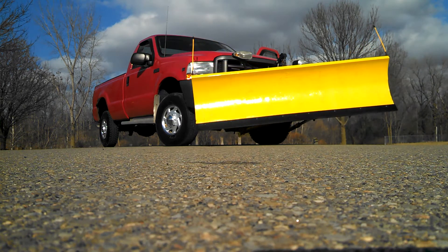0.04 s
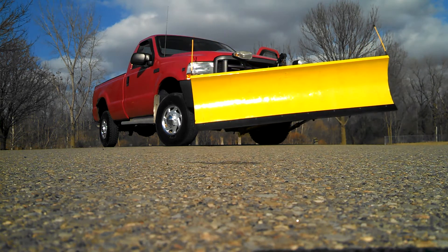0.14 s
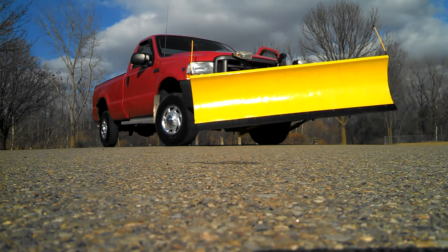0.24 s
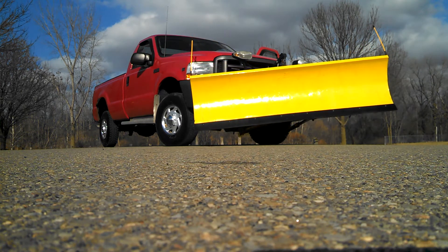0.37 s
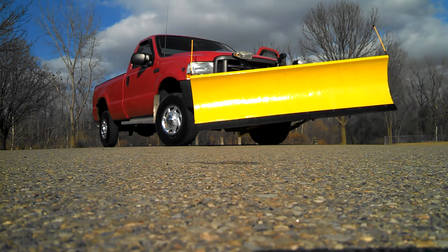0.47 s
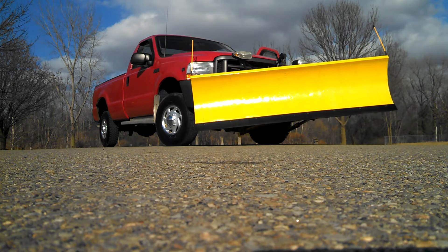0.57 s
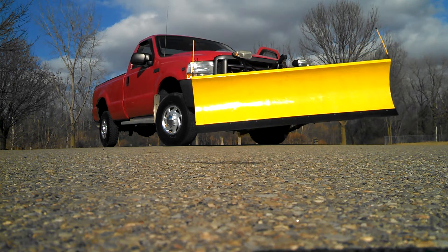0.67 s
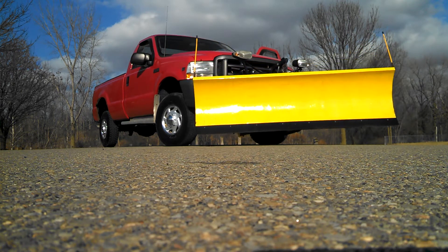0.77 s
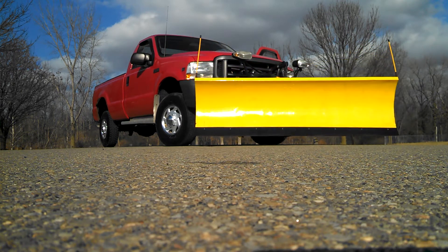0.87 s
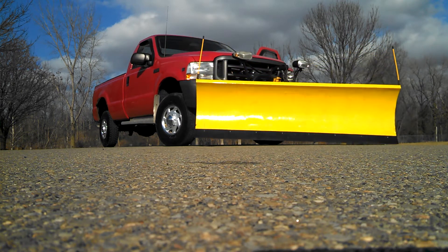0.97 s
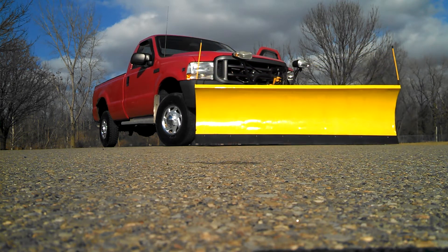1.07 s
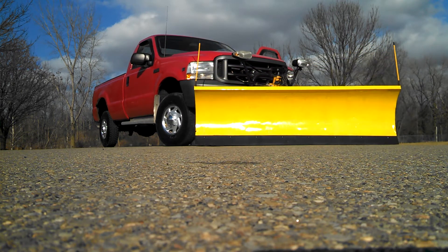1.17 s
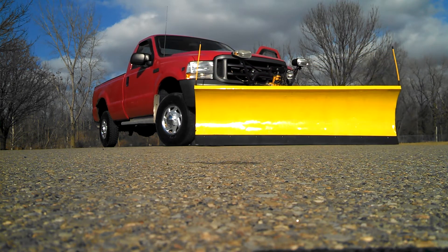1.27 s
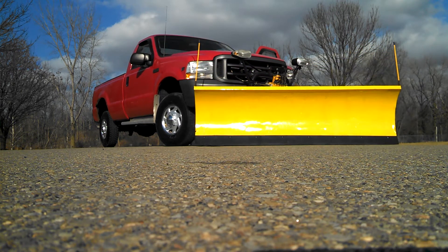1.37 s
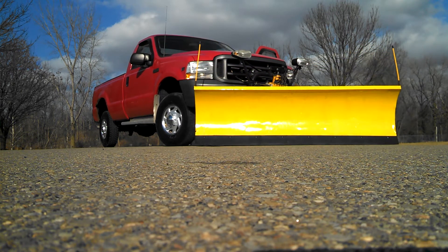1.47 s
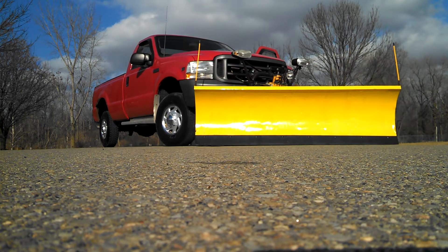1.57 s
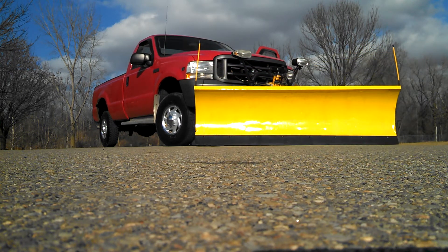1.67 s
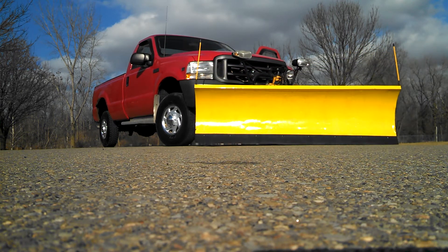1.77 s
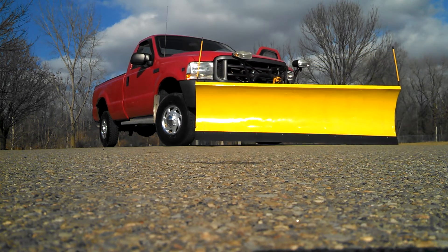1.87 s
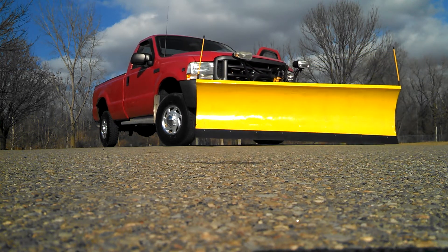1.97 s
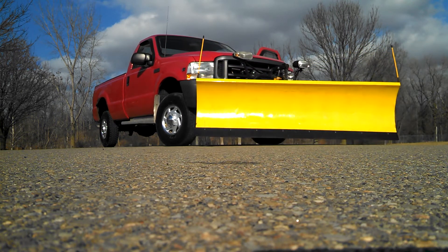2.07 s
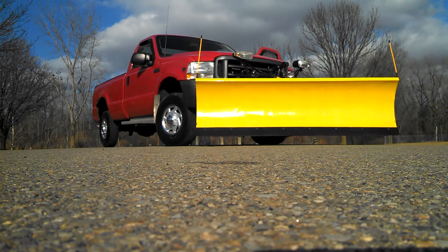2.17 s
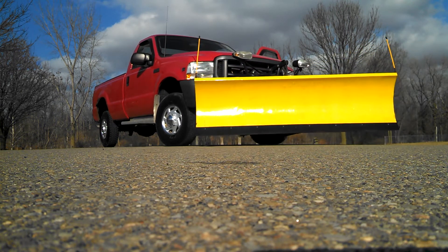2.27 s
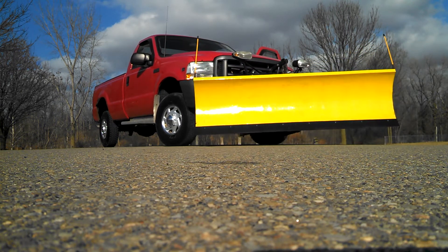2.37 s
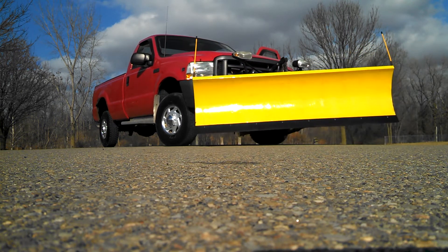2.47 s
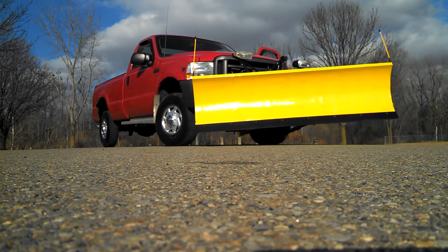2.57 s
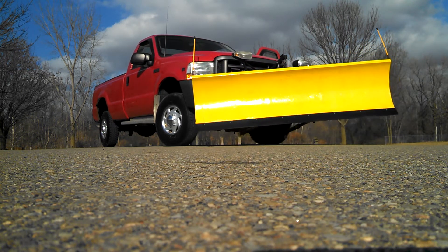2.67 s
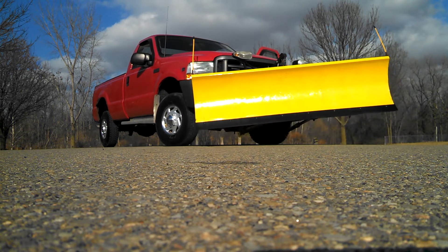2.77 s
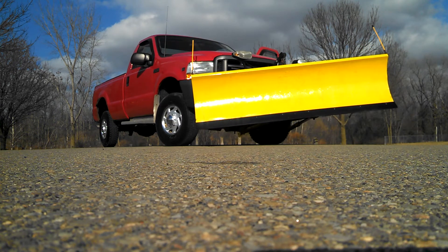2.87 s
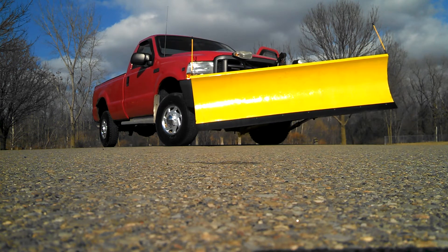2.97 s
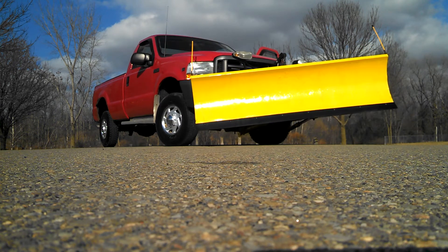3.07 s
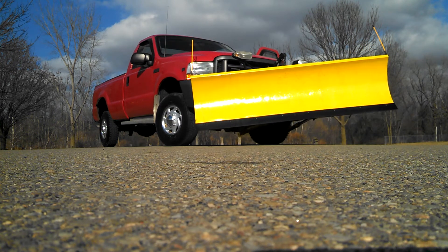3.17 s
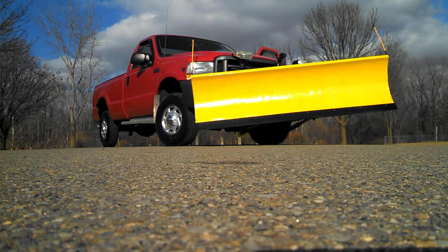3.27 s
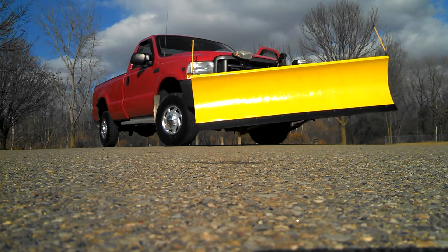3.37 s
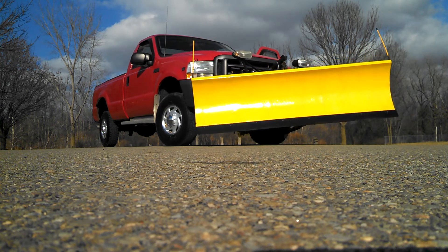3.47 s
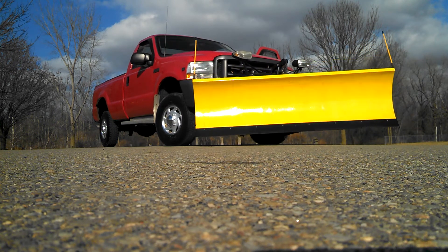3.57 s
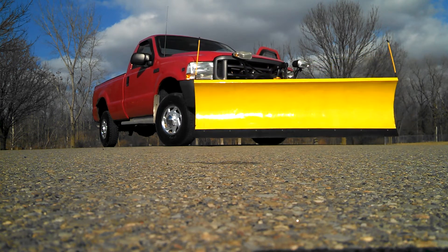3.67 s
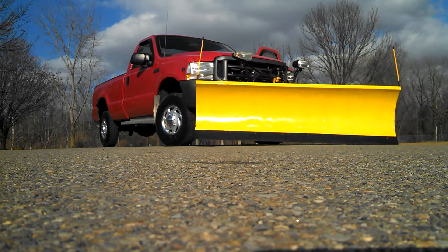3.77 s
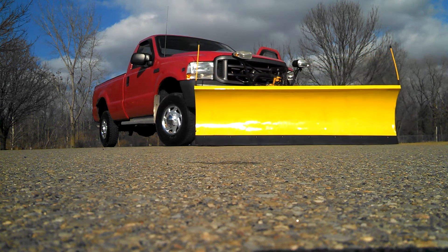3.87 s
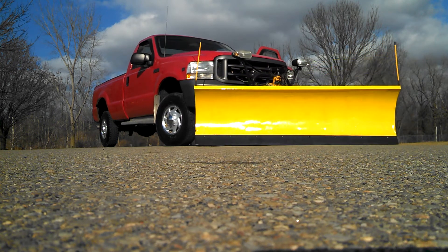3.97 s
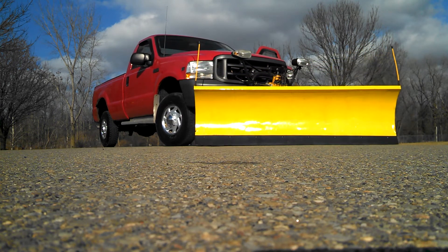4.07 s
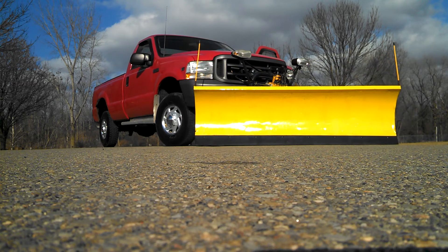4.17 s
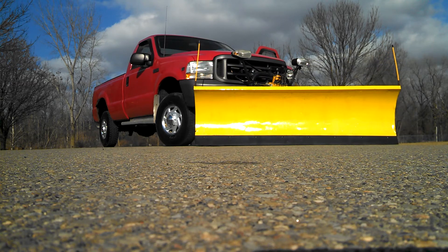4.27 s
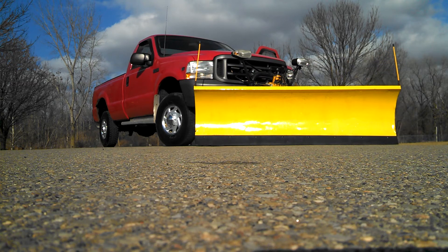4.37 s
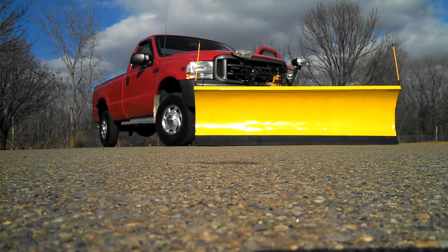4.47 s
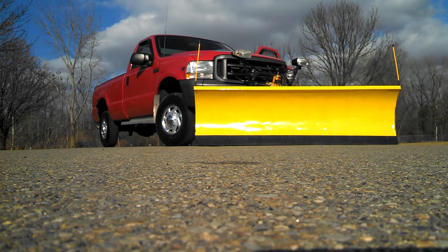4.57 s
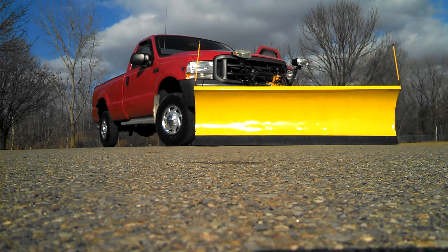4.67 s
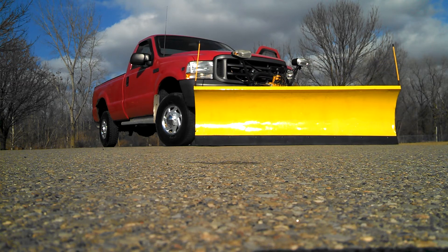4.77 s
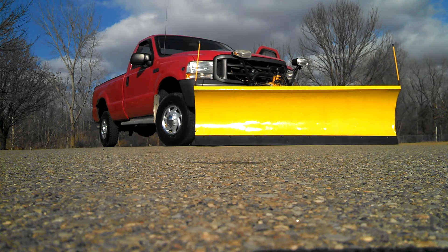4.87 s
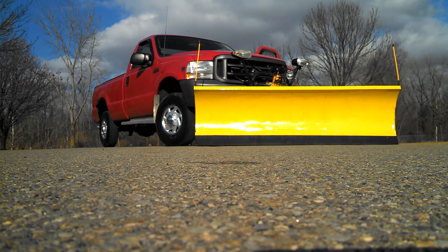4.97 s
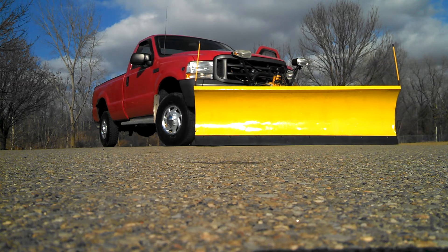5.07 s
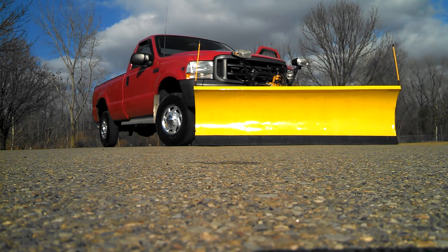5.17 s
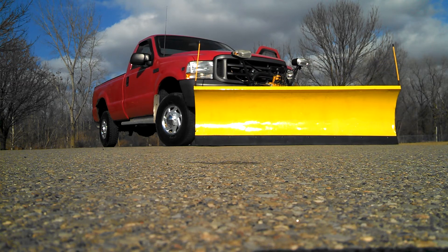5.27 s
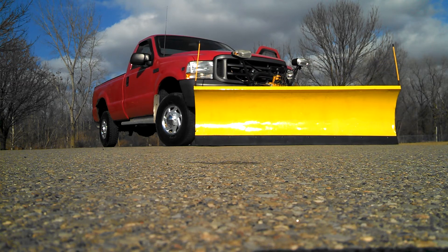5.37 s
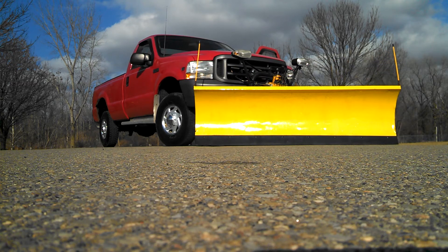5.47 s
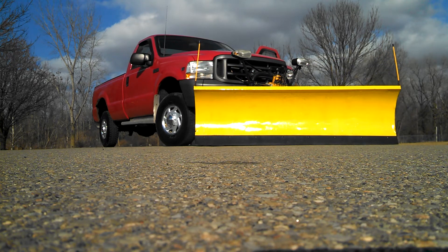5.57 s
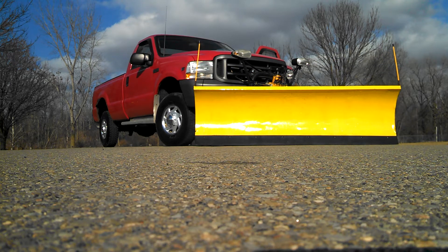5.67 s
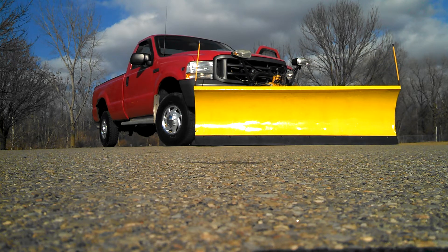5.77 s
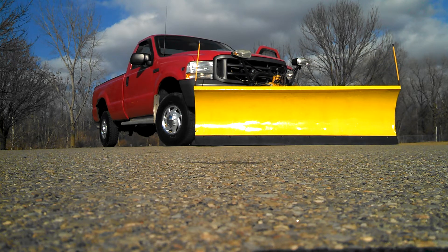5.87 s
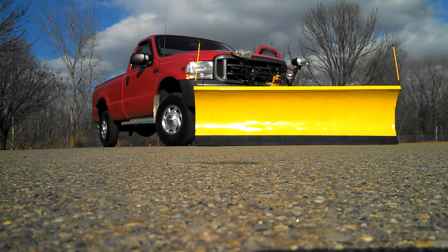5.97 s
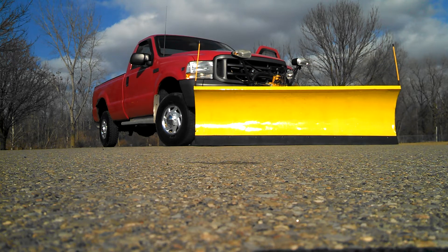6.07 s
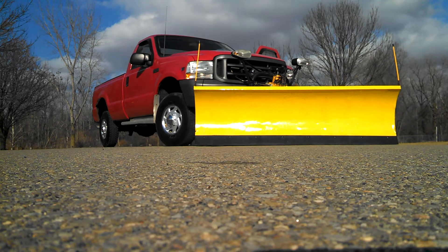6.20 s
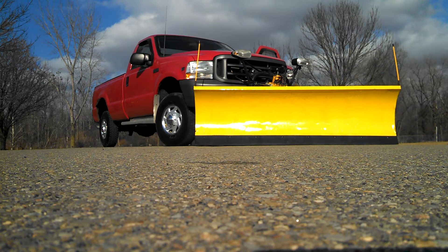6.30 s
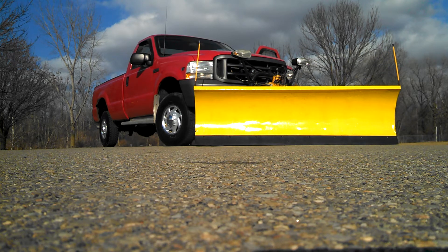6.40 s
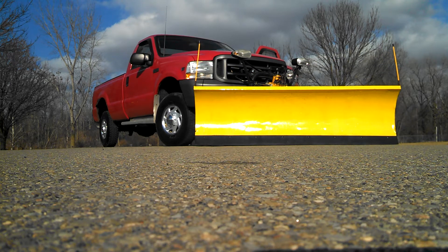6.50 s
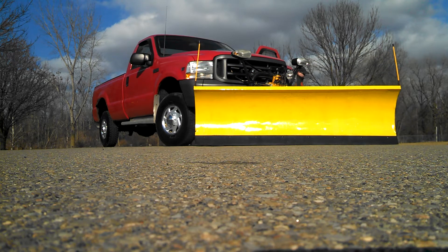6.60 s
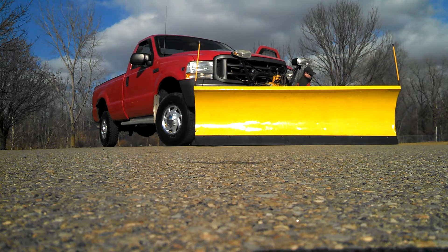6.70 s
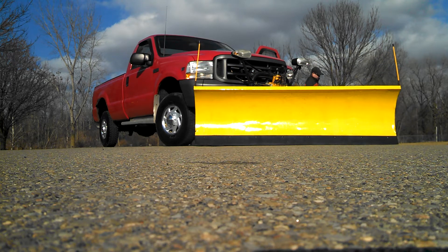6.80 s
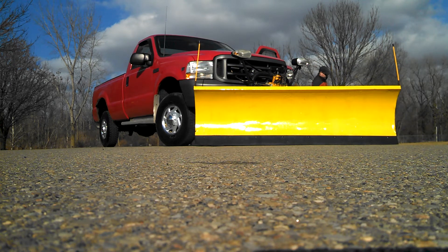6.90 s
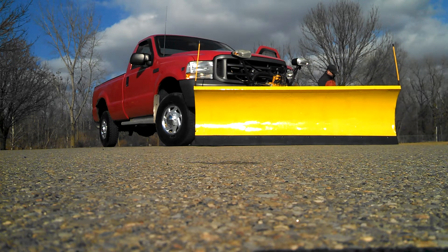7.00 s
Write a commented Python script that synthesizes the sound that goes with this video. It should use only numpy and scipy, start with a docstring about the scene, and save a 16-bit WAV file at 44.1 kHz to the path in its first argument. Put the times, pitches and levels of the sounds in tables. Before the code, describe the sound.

A steel plow blade drops onto pavement twice with ringing bangs and rattling chains, lifted by a whining hydraulic pump while a truck idles.

```python
"""A truck's steel plow blade drops, knocks and bounces on a paved lot, ringing as its pins and chains rattle.
An electric hydraulic pump lifts it: the gears whine, and oil rushes and whistles through the valves.
Behind it the engine idles, a little slower while the pump runs. Two close microphone openings on the
ground form left and right; an automatic volume control ducks after each loud blow and creeps back."""
import sys
import numpy as np
from scipy import signal
from scipy.fft import rfft, irfft, next_fast_len
from scipy.io import wavfile
from scipy.ndimage import uniform_filter1d, map_coordinates

SR = 44100
rng = np.random.default_rng(int(sys.argv[2]) if len(sys.argv) > 2 else 0)


def int16_out(signal):
    """Quantize to a 16-bit WAV file."""
    q = np.round(np.clip(np.atleast_2d(signal).T, -1, 1) * 32767)
    wavfile.write(sys.argv[1], SR, q.astype(np.int16))


N = 310464

# The notes the steel blade rings at: (pitch [Hz], level [dB], time to fade by 60 dB [s])
BLADE_NOTES = [(152, -10, 0.1), (224, -9, 0.12), (350.8, -6, 1), (617.3, -6.5, 0.14), (820, -14.5, 0.33),
               (978, -9, 0.14), (1162, -5, 0.089), (1398, 1.5, 0.064), (1487, 1, 0.044), (1637, -7.5, 0.55),
               (1724, 2.5, 0.021), (1860, -14, 0.21), (2318, -10.5, .08), (4470, -7, 0.065)]
# Hard hits of the blade's edge or its stop:
# (time [s], level [dB], thud [dB], clank [dB], rattle [dB], crack [dB], treble snap [dB])
HARD_HITS = [(0.9866, -4, -40, -3.5, -22, 24, 0.5), (1.095, 0.5, -16, -7, -26, 12, -13),
             (3.3655, -18, -13, -2, -6.5, 29, -14), (3.7677, -4.5, -28, -1, -24, 23.5, 0),
             (3.885, -0.5, -15, -2.5, -26, 24.5, -7)]
# Softer jolts of pins, chain and frame:
# (time [s], level [dB], rise time [s], thud [dB], clank [dB], rattle [dB], clink pitch [Hz])
FRAME_JOLTS = [(0.042, -5.5, 0.0024, -22.5, -7.5, -21.5, 794), (0.056, -9, 0.0031, -12, -7, -33, 730),
               (0.102, -16.5, 0.0071, -10, -11, -28, 682), (0.558, -24.5, 0.011, -6, 6.5, -37, 733),
               (0.584, -19, 0.0073, -6, -3, -17, 809), (0.6, -28, .005, 1.5, -12, -30, 350),
               (0.646, -31, 0.01, 9, 8, -24, 143.5), (0.822, -23.5, .01, 2, -1, -19, 1090),
               (0.849, -27.5, 0.009, -0.5, -12, -25, 352), (0.9, -30, 0.01, -3, -6, -18, 1060),
               (0.999, -5.5, 0.0057, -15, -8, -35, 702), (1.012, -5.5, 0.0092, -14, -0.5, -13, 844),
               (1.124, -2.5, 0.019, -3, -1, -19, 1700), (1.169, -16.5, 0.0075, 8, -18, -31, 756),
               (1.213, -22, 0.011, -14, 3, 5, 1090), (1.235, -13.5, 0.024, -23, 6.5, 4.5, 1613),
               (1.912, -21.5, 0.0026, -22, 7.5, -6.5, 994), (1.925, -23, .004, -15, 3, -15, 1264),
               (2.794, -19, 0.012, -6.5, -9, -43, 808), (2.84, -19, 0.016, -11, 0.5, -14, 1627),
               (3.081, -17, 0.0078, -5.5, -4.5, -33, 843), (3.187, -33, 0.012, -17, 13, -15, 1040),
               (3.222, -24, 0.0056, -4.5, 1.5, -16, 1096), (3.329, -17, 0.019, -5.5, -7, -32, 767),
               (3.349, -16.5, 0.0041, -13, 2, -15, 796), (3.356, -15, 0.0051, -15, 0.5, -12, 891),
               (3.7, -18.5, 0.012, -7, 7, -14, 1730), (3.78, -4.5, 0.0047, -17, -9, -16, 806),
               (3.8, -7.5, 0.012, -5, 2, -10.5, 634), (3.897, -2.5, 0.014, -5, -29, -12, 354),
               (3.925, -6, .012, -1, -15, -29, 354), (3.951, -8, 0.012, -6, -6, -2, 1350)]
# The bands a blow is split into, from bass to treble: (centre [Hz])
BLOW_BANDS = (60, 170, 650, 1700, 4800, 10500, 15000)
# Ringing chain links and pins: (time [s], pitch [Hz], level [dB], time to fade by 60 dB [s])
LINK_RINGS = [(1.013, 6900, -23, 0.098), (1.014, 3900, -35, .08), (1.028, 4400, -32, .05),
              (1.036, 6450, -26, 0.104), (1.126, 1730, -14, .1), (1.21, 4800, -25, .08),
              (1.245, 4120, -24, .06), (2.845, 3840, -32, .09), (2.843, 1620, -21, .07),
              (3.092, 3470, -40, 0.071), (3.222, 4480, -39, 0.09), (3.364, 6560, -36, .08),
              (3.702, 1790, -22, .15), (3.728, 4580, -25, 0.067), (3.703, 3700, -31, .08),
              (3.73, 1750, -16, .08), (3.768, 3980, -12, 0.033), (3.806, 4360, -21, 0.085),
              (3.902, 4150, -33, 0.063)]
# Ticks of an electric valve or a chain link: (time [s], level [dB], low part [dB], middle part [dB])
BRIGHT_TICKS = [(0.324, -36.5, 2, -22), (1.1253, -14.5, 8, -12), (1.6002, -15.5, 2.5, -11),
                (1.7119, -35.5, 28.5, -3), (3.1284, -41, -13, -19), (3.724, -10, 5, -18.5),
                (4.187, -28, 10, -5), (4.9344, -38, 4, -16)]
# Tone colour of many chains and pins jingling: (frequency [Hz], relative level [dB])
JINGLE_COLOUR = [(1500, -30), (3000, -2), (4500, 7.5), (7000, 3.5), (10000, -6.5), (15000, -25)]
# The pump's gear whine: (time [s], pitch [Hz], level [dB], level at 2x pitch [dB], level at 3x pitch [dB])
GEAR_WHINE = [(1.727, 628.6, -26, -42, -43), (1.775, 626, -20.5, -49, -46), (1.85, 618.4, -25, -39, -47),
              (1.911, 604.3, -31, -44, -48), (1.95, 595, -34, -40, -52), (2.01, 562, -30, -50, -47),
              (2.06, 567, -32, -52, -48), (2.15, 568.3, -31, -42, -45), (2.18, 570.4, -47, -38, -39),
              (2.25, 574.5, -39.5, -42, -50), (2.29, 578, -37, -45, -43), (2.34, 578, -43, -46, -52),
              (2.4, 571.8, -32, -39, -42), (2.445, 564, -35, -50, -55), (2.49, 560.4, -27.5, -49, -44),
              (2.57, 555, -30, -55, -58), (2.65, 548.5, -33.5, -52, -51), (2.73, 542, -31, -55, -56),
              (2.81, 550, -35.5, -58, -56)]
# Oil whistling in the valves: (start [s], end [s], pitch [Hz], level [dB])
VALVE_WHISTLES = [(.05, 0.22, 818, -35), (.15, .6, 1684, -48), (.47, .98, 1057, -43),
                  (1.7, 1.9, 730, -37.5), (2.24, 2.6, 747, -43.5), (2.1, 2.55, 867, -47.5),
                  (2.46, 2.72, 1688, -46), (2.87, 3.12, 889, -41.5), (2.88, 3.16, 1464, -39),
                  (2.856, 3.3, 1750, -48), (2.9, 3.08, 2240, -58), (3.24, 3.36, 1072, -41.5)]
# Oil on the move: (start [s], start of fade-out [s], rush [dB], rasp [dB])
OIL_STROKES = [(-.1, 0.476, -34, -42), (0.55, 1.02, -36.5, -45.5), (1.76, 2.04, -34.5, -45),
               (1.986, 2.59, -38, -51), (2.603, 3.304, -41, -43), (3.465, 3.758, -42, -47)]
# Tone colours of the oil's rush and of its rasp in the valve: (frequency [Hz], relative level [dB])
OIL_COLOUR = [(80, -9.5), (200, 0.5), (500, -1.5), (900, -1), (1400, -17), (2500, -27.5), (5000, -24),
              (9000, -36.5)]
RASP_COLOUR = [(900, -35), (1300, 9), (1600, 14.5), (2100, 5), (3000, -37), (6000, -43)]
# When the pump motor loads the engine through the alternator: (start [s], start of fade-out [s])
PUMP_LOADS = [(-1, .5), (1.68, 3.3)]
# Exhaust tones; uneven cylinders add the quarter steps: (multiple of the firing rate, relative level [dB])
EXHAUST_TONES = [(.75, -32), (1, 4), (1.25, -19), (1.5, -21), (1.75, -20), (2, -18), (2.25, -22.5),
                 (2.5, -24), (2.75, -25), (3, -15.5), (3.25, -27), (3.5, -26), (3.75, -27), (4.25, -28),
                 (4.75, -27), (5, -20), (5.25, -25), (5.5, -26), (5.75, -19.5), (6.5, -28), (6.75, -24),
                 (7.5, -28), (7.75, -21), (8, -27), (11.75, -27), (12.75, -30)]
# Tone colours of the engine's rush and of its valve clatter: (frequency [Hz], relative level [dB])
ENGINE_COLOUR = [(25, -43), (55, -27), (90, -18), (150, -25), (250, -23.5), (420, -21), (560, -21),
                 (640, -25), (850, -25.5), (1100, -24.5), (1600, -24.5), (2200, -27), (3200, -35),
                 (6500, -35.5), (9000, -46), (11500, -58), (14500, -45)]
CLATTER_COLOUR = [(600, -27), (1000, -2.5), (1400, 2), (1800, 4), (2600, -24), (5000, -25.5)]
# Extra shaping of the faint, wide rush below the lowest dead spot: (frequency [Hz], gain [dB])
WIDE_RUSH_COLOUR = [(60, -35), (150, -9), (220, -2), (300, -17), (600, -3.5), (1200, -20), (2300, 2)]
# Left compared with right for each source: (frequency [Hz], left louder by [dB], left ahead by [rad])
BLADE_PLACE = [(30, -12, -2), (94.6, 13.5, 4.5), (155, 9, 0), (260, 3.5, 1), (580, 6.5, 0.5),
               (910, 3.5, 0.5), (1440, -3.5, -0.15), (2260, -3, 0.67)]
ENGINE_PLACE = [(32.7, 9.5, -3), (93, 6.5, 6), (149, 16.5, 0.5), (191, 13, -1.3), (288, 13.5, 1.2),
                (530, 10.5, -0.5), (1064, 5.5, 0.4), (1430, -2, -1), (2300, -9, 3.5)]

NULL_HZ = 2765  # the lowest dead spot of the microphone pair, where sound cancels
LANDINGS_S = (.987, 3.767)  # the blade meets the ground


def blade_hits():
    """The blade hits hard: a crack, a bright snap and ringing steel."""
    out, t = np.zeros(N + SR), np.arange(SR // 4) / SR
    snap_hz, snap_fade_s, rebound_s = 2600, .016, .00246
    snap_colour = lambda hz: 1 / (1 + (snap_hz / (hz + 1)) ** 4) / (1 + (hz / snap_hz / 2) ** 2)
    for start, db, *colour_db, crack_db, snap_db in HARD_HITS:
        bite = np.maximum(t - .0012, 0) / .00013  # the edge bites just after first contact
        crack = amp(crack_db) * bite * (2 - bite) * np.exp(-bite)  # one short push and its spring back
        crack += amp(-12.5) * np.roll(crack, round(rebound_s * SR))  # the edge bites a second time
        snap = amp(snap_db - 60 * t / snap_fade_s) * filtered(rng.standard_normal(len(t)), snap_colour)
        steel = steel_blow(t, colour_db, fade_s=.24, damping=.7, contact=crack)
        onset = np.clip(t / .0014, 0, 1) ** 3
        out[round(start * SR):][:len(t)] += amp(db) * onset * (steel + snap)
    return out[:N]


def steel_blow(t, colour_db, fade_s, damping, contact):
    """Noise, the blade's notes and the contact sound fade band by band; damping makes treble die first."""
    variation = rng.standard_normal((len(BLADE_NOTES), 2))
    ring = sum(amp(db + 3.15 * louder - 60 * t / ring_s) * np.sin(2 * np.pi * hz * (1 + .016 * higher) * t)
               for (hz, db, ring_s), (louder, higher) in zip(BLADE_NOTES, variation))
    source = 1.6 * rng.standard_normal(len(t)) + ring + contact
    split = lambda hz: np.array([along(BLOW_BANDS, band, hz) for band in np.eye(len(BLOW_BANDS))])
    thud, clank, rattle = colour_db
    band_db = np.array([-60, thud + 14, 0, clank, rattle + 2, rattle - 21, rattle - 11])
    band_fade_s = fade_s * (np.array(BLOW_BANDS) / 650) ** -damping
    return np.sum(filtered(source, split) * amp(band_db[:, None] - 60 * t / band_fade_s[:, None]), axis=0)


def frame_jolts():
    """Pins, chain and frame jolt: many small contacts swell into one knock, and a loose part clinks."""
    out, t = np.zeros(N + SR), np.arange(SR // 7) / SR
    contacts_s = np.arange(0, t[-1], .003)
    for start, db, rise_s, *colour_db, clink_hz in FRAME_JOLTS:
        bumps = amp(1.5 * np.interp(t, contacts_s, rng.standard_normal(len(contacts_s))))
        blur = np.cumsum(rng.normal(0, .13, len(t)))  # the part rattles, so its pitch blurs
        clink = amp(-1) * np.sin(2 * np.pi * clink_hz * t + blur)
        steel = steel_blow(t, colour_db, fade_s=.14, damping=.099, contact=clink)
        onset = 1 - np.exp(-t / rise_s)
        out[round(start * SR):][:len(t)] += amp(db) * onset * bumps * steel
    return out[:N]


def chain_links():
    """Each link or pin rings briefly on one slightly blurred note."""
    out, t = np.zeros(N + SR), np.arange(SR // 6) / SR
    onset = 1 - np.exp(-t / .003)
    for start, hz, db, fade_s in LINK_RINGS:
        blur = np.cumsum(rng.normal(0, .1, len(t)))
        note = np.sin(2 * np.pi * hz * t + blur)
        out[round(start * SR):][:len(t)] += amp(db - 60 * t / fade_s) * onset * note
    return out[:N]


def ticks():
    """An electric valve or a chain link clicks: a short, hissy burst of noise."""
    out, t = np.zeros(N + SR), np.arange(SR // 8) / SR
    colour_hz, fade_s = (800, 2500, 7000, 9500, 12500, 15200), .055
    for start, db, low_db, mid_db in BRIGHT_TICKS:
        colour_db = (low_db - 5, low_db - 4.5, low_db - 7.5, mid_db, -4, 3)
        hiss = filtered(rng.standard_normal(len(t)), lambda hz: amp(along(colour_hz, colour_db, hz)))
        out[round(start * SR):][:len(t)] += amp(db - 60 * t / fade_s) * hiss
    return out[:N]


def shaking(fade_s=1.84):
    """How strongly the frame and oil shake: a jump at each hard hit that then dies away."""
    t = np.arange(N) / SR
    return sum((t > start) * amp(db - 60 * np.abs(t - start) / fade_s) for start, db, *_ in HARD_HITS)


def chain_jingle(shake):
    """Chains and pins jingle densely while the frame shakes."""
    return amp(-33 + 2.5 * wobble(56)) * lag(shake, seconds=.02) * noise(JINGLE_COLOUR, patchy_db=2.2)


def pump_gears():
    """The gears whine with two overtones; their teeth mesh roughly, so the level flutters."""
    times, *columns = np.transpose(GEAR_WHINE)
    hz, *levels = [np.interp(np.arange(N) / SR, times, column) for column in columns]
    whine = sum(amp(db) * tone(k * hz, waver_db=1.4, drift=.00343) for k, db in enumerate(levels, 1))
    return gate(times[0], times[-1], ramp_s=.0065) * amp(1.4 * wobble(70)) * whine


def oil_flow(shake, ramp_s=.16):
    """Oil rushes, and rasps in the valve, whenever it flows or a hit shakes it."""
    rush_level, rasp_level = amp(-22.5) * shake, amp(-36) * shake
    for start, end, rush_db, rasp_db in OIL_STROKES:
        flowing = gate(start, end + ramp_s, ramp_s)
        rush_level += amp(rush_db) * flowing
        rasp_level += amp(rasp_db) * flowing
    rush = rush_level * amp(1.2 * wobble(14)) * noise(OIL_COLOUR, patchy_db=1.4)
    rasp = rasp_level * amp(4 * wobble(60)) * noise(RASP_COLOUR, patchy_db=2.5)
    return rush + rasp


def valve_whistles():
    """Oil in the valves whistles on held, fluttering notes."""
    flutter = amp(2.5 * wobble(90) - 1)
    return flutter * sum(amp(db) * gate(start, end, ramp_s=.021) * tone(hz, waver_db=3.2, drift=.011)
                         for start, end, hz, db in VALVE_WHISTLES)


def engine():
    """The exhaust hums, a rush throbs and the valves tap at each firing; the pump's load slows it all."""
    t = np.arange(N) / SR
    idle_hz, loaded_hz, ramp_s = 69.5, 65.66, .1762
    load = sum(gate(start, end + ramp_s, ramp_s) for start, end in PUMP_LOADS)
    firing_hz = idle_hz + (loaded_hz - idle_hz) * load
    firings = np.cumsum(firing_hz) / SR
    swell_db, swell_s = 8, 1.62  # the noisy parts are louder after a landing, then fade back
    swell = amp(swell_db * sum((t > s) * np.clip(1 - (t - s) / swell_s, 0, 1) for s in LANDINGS_S))
    exhaust = sum(amp(db) * tone(k * firing_hz, waver_db=min(.4 * k, 3), drift=.003)
                  for k, db in EXHAUST_TONES)
    hum = amp(-31.5 - 1.5 * load) * exhaust
    throb = 1 + .081 * np.cos(2 * np.pi * firings) + .039 * wobble(40)
    rush = amp(-37) * throb * noise(ENGINE_COLOUR, patchy_db=1)
    idle = hum + swell * (rush + valve_clatter(firings, firing_hz))
    return stereo(idle, ENGINE_PLACE) + wide_rush(swell)


def valve_clatter(firings, firing_hz, fade_s=.025):
    """The engine's valves tap once per firing, each time with a random strength."""
    tap_db = 6.9 * rng.standard_normal(int(firings[-1]) + 1)
    since_tap_s = (firings % 1) / firing_hz
    taps = amp(tap_db[firings.astype(int)] - 60 * since_tap_s / fade_s)
    return amp(-51) * unit(taps) * noise(CLATTER_COLOUR, patchy_db=4.5)


def wide_rush(swell):
    """A faint, wide rush, opposed in left and right, fading at the dead spots."""
    rush = amp(-42.5) * swell * noise(ENGINE_COLOUR, patchy_db=1.5)
    opposed = stereo(rush, ENGINE_PLACE) * [[1], [-1]]
    low = lambda hz: amp(along(*np.transpose(WIDE_RUSH_COLOUR), hz)) * np.clip((NULL_HZ - hz) / 400, 0, 1)
    high = lambda hz: amp(-8) * np.abs(np.sin(np.pi * hz / NULL_HZ)) * (hz > NULL_HZ)
    return filtered(opposed, lambda hz: low(hz) + high(hz))


def stereo(x, place):
    """Two close microphone openings: the right channel is x, the left is shifted in level and phase."""
    points_hz, louder_db, ahead_rad = np.transpose(place + [(NULL_HZ, 0, np.pi)])

    def left(hz):
        below = hz < NULL_HZ
        phase = np.where(below, along(points_hz, ahead_rad, hz), np.pi + 2 * np.pi * hz / NULL_HZ)
        db = np.where(below, along(points_hz, louder_db, hz), -2.5 * np.sin(np.pi * hz / NULL_HZ) ** 2)
        return amp(db) * np.exp(1j * phase)
    return np.array([filtered(x, left), x])


def volume_control(x):
    """Peaks over the limit pull the volume down; it climbs back at a steady pace."""
    limit_db, deepest_db, start_db, climb_db_per_s = -15, -19.5, -11.5, 11.5
    peak_db = 10 * np.log10(lag(np.max(x ** 2, axis=0), seconds=.0012) + 1e-12)
    needed_db = np.clip(1.05 * (limit_db - peak_db), deepest_db, 0)
    climb_db = climb_db_per_s * np.arange(N) / SR
    gain_db = np.minimum(np.minimum.accumulate(needed_db - climb_db), start_db) + climb_db
    return x * amp(start_db + lag(gain_db - start_db, seconds=.055))


def amp(db):
    """Turn decibels into a plain multiplier."""
    return 10 ** (np.asarray(db) / 20)


def unit(x):
    """Scale x to an average strength (rms) of 1."""
    return x / np.sqrt(np.mean(x ** 2) + 1e-20)


def along(points_hz, values, hz):
    """Read between the points of a curve, with octaves evenly spaced."""
    return np.interp(np.log(hz + 1), np.log(np.add(points_hz, 1)), values)


def gate(start, end, ramp_s):
    """Fade from 0 to 1 and back along straight ramps."""
    t = np.arange(N) / SR
    return np.clip(np.minimum(t - start, end - t) / ramp_s, 0, 1)


def lag(x, seconds):
    """Follow x sluggishly, smoothing out quick changes."""
    keep = np.exp(-1 / (SR * seconds))
    return signal.lfilter([1 - keep], [1, -keep], x)


def wobble(rate):
    """A smooth curve through `rate` random values a second."""
    t = np.arange(0, N + 64, 64) / SR
    points = rng.standard_normal(int(N * rate / SR) + 4)
    return np.interp(np.arange(N) / SR, t, map_coordinates(points, [t * rate]))


def filtered(x, response):
    """Multiply each frequency in x by response(hz)."""
    size = next_fast_len(x.shape[-1] + 4096)
    return irfft(rfft(x, size) * response(np.fft.rfftfreq(size, 1 / SR)), size)[..., :x.shape[-1]]


def noise(colour, patchy_db):
    """Noise of a given tone colour, with random louder and softer patches in time and pitch."""
    spectrum = signal.stft(rng.standard_normal(N), nperseg=512)[2]
    patches = uniform_filter1d(rng.standard_normal(spectrum.shape), size=6, axis=0)
    patches = uniform_filter1d(patches, size=10, axis=1)
    hiss = signal.istft(spectrum * amp(patchy_db * unit(patches)), nperseg=512)[1][:N]
    return unit(filtered(hiss, lambda hz: amp(along(*np.transpose(colour), hz))))


def tone(hz, waver_db, drift):
    """A pure tone whose level and pitch wander a little."""
    cycles = np.cumsum(hz * (1 + drift * wobble(25))) / SR
    return np.sqrt(2) * amp(waver_db * wobble(18)) * np.sin(2 * np.pi * (cycles + rng.random()))


def scene():
    """Blade, chains and pump in front, the idling engine behind."""
    background, shake = engine(), shaking()
    pump = pump_gears() + oil_flow(shake) + valve_whistles()
    plow = blade_hits() + frame_jolts() + chain_links() + ticks() + chain_jingle(shake)
    return stereo(plow + pump, BLADE_PLACE) + background


def record(dry):
    """The volume control acts, peaks too big are flattened, and deep bass and the top treble are cut."""
    bass_hz, top_hz = 38, 15700
    flattened = np.clip(volume_control(dry), -1, 1)
    return filtered(flattened, lambda hz: (hz < top_hz) / np.sqrt(1 + (bass_hz / (hz + 1)) ** 4))


dry = scene()
out = record(dry)
int16_out(out)
```